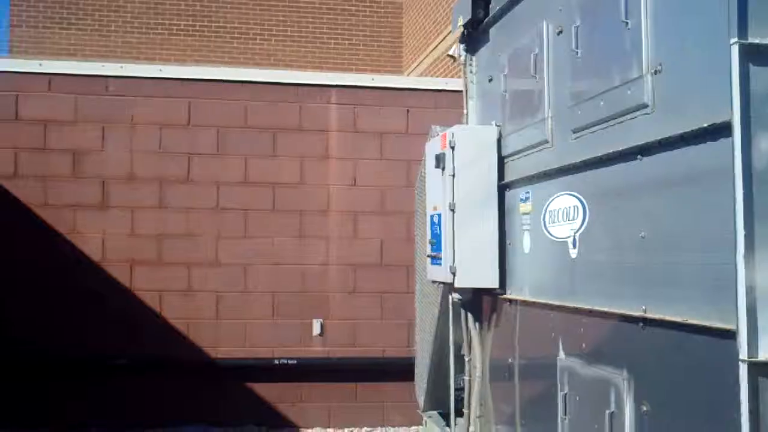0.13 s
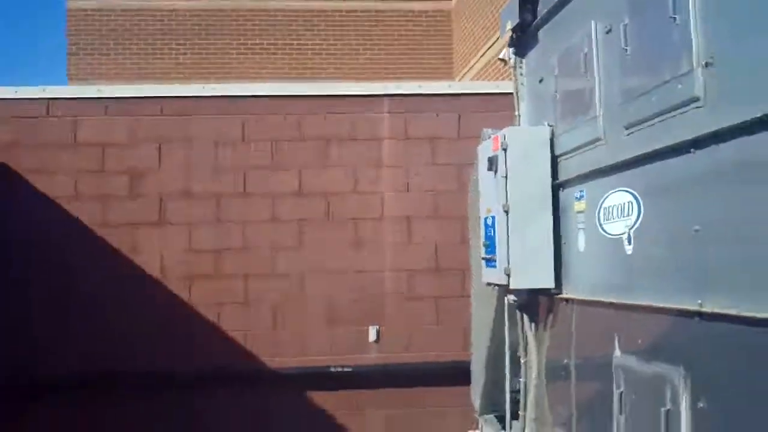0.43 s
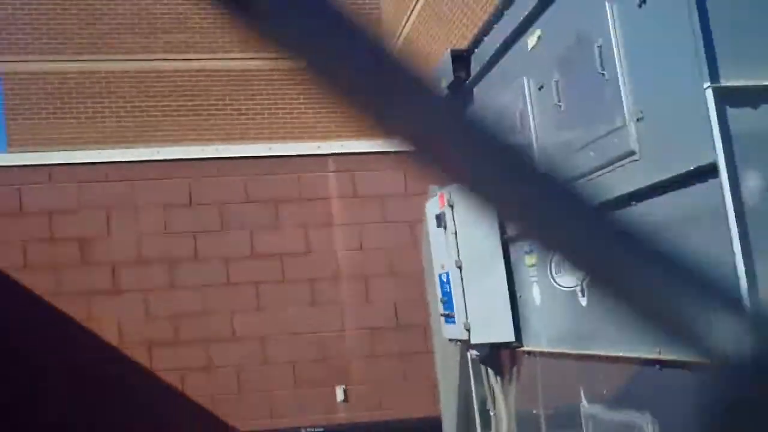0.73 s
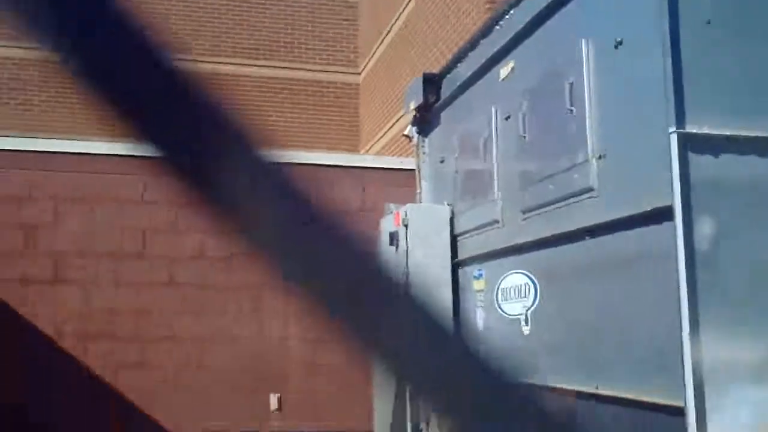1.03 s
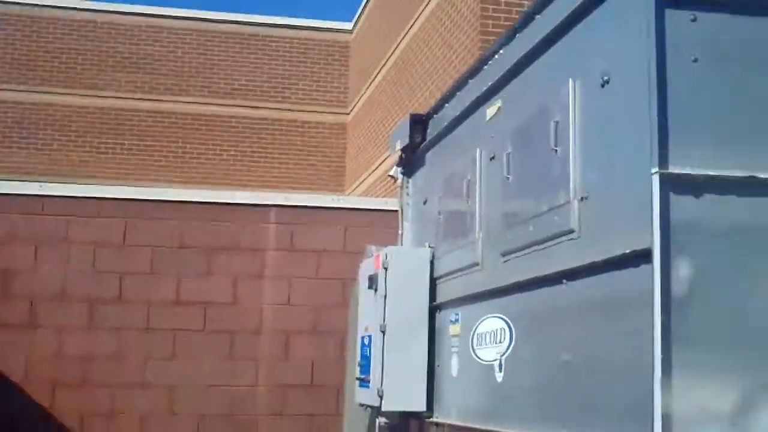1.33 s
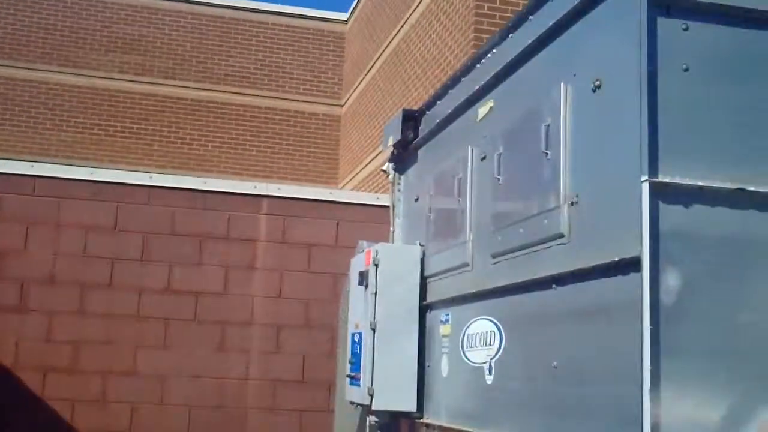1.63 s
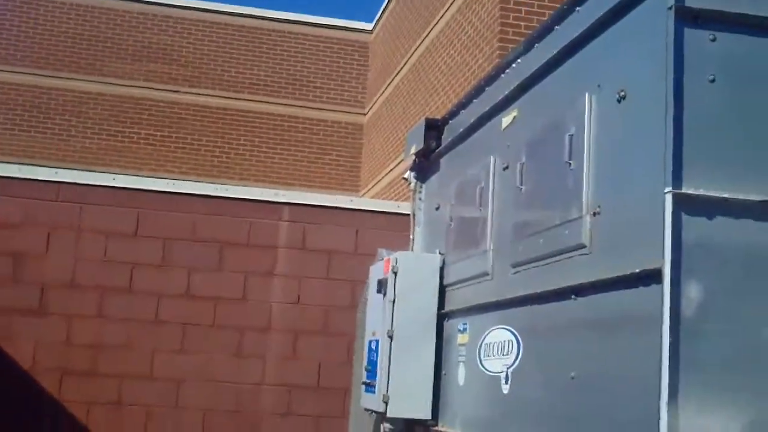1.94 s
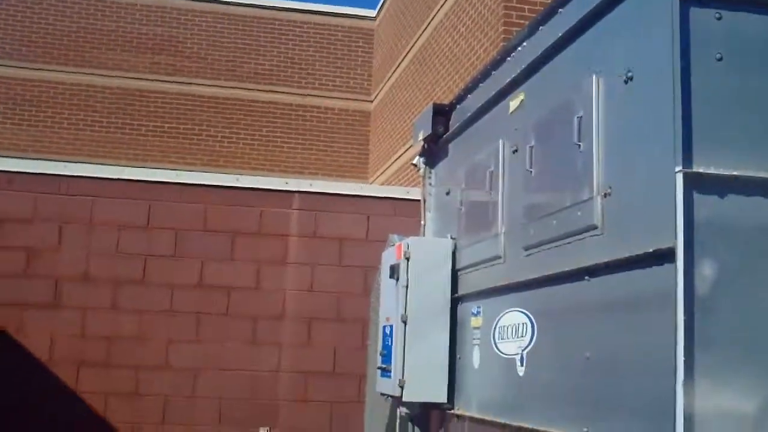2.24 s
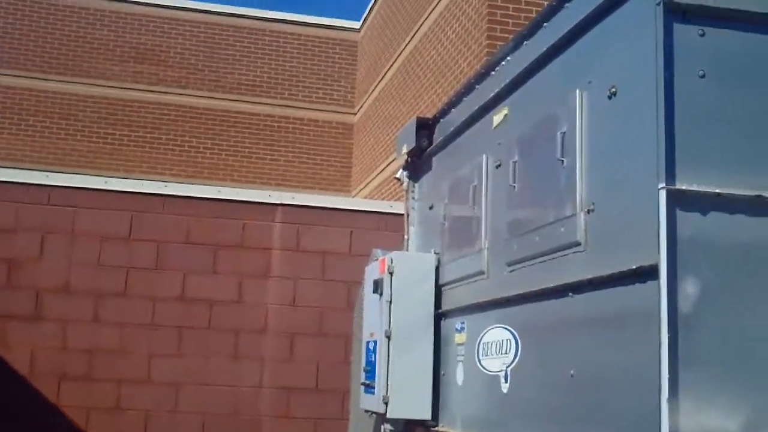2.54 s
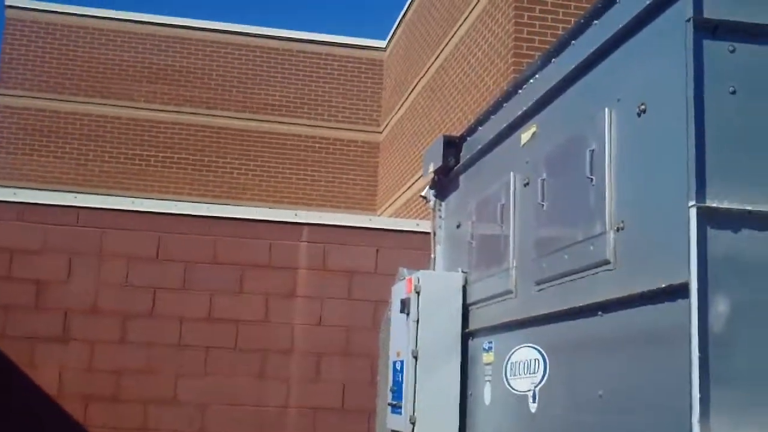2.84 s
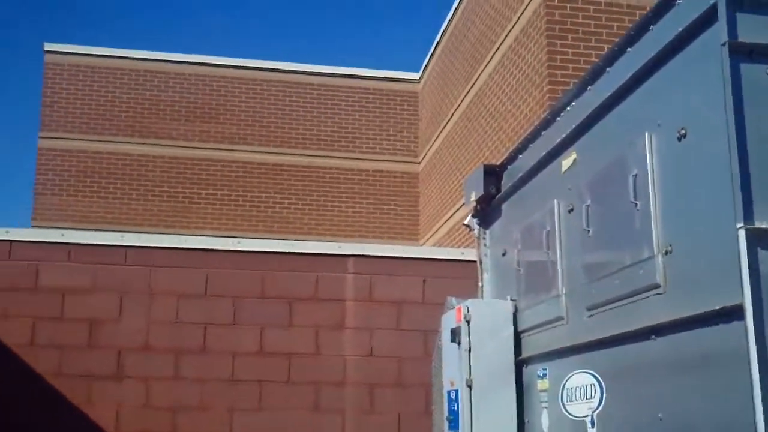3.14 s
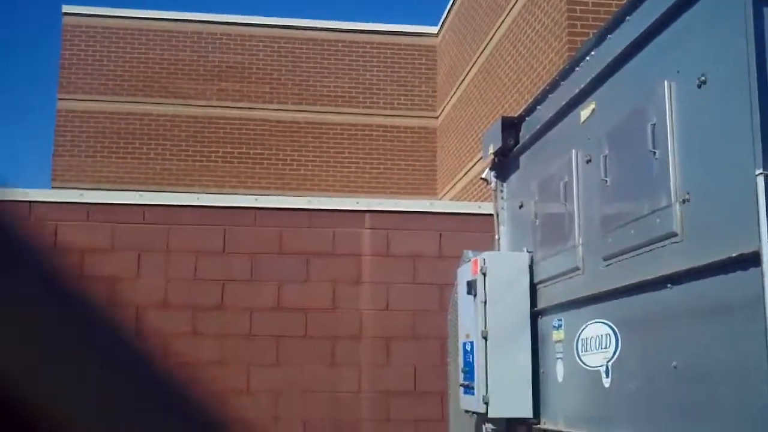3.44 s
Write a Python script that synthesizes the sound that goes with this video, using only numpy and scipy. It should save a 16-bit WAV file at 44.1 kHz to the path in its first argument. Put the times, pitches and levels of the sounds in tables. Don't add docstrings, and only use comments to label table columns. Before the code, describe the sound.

A large fan in outdoor cooling equipment roars steadily in a walled brick yard. A loud overloaded pop opens it, then fingers tick and rub on the small hand-held recorder's plastic case, with sparser clicks later.

```python
import sys
import numpy as np
from scipy import signal
from scipy.fft import rfft, irfft
from scipy.io import wavfile

SR = 44100
rng = np.random.default_rng(int(sys.argv[2]) if len(sys.argv) > 2 else 0)


def to_wav(sig):
    pcm = np.clip(np.atleast_2d(sig), -1, 1) * 32767
    pcm = np.round(pcm).astype(np.int16)
    wavfile.write(sys.argv[1], SR, pcm.T)


def magnitude_from_level(level_db):
    exponent = np.asarray(level_db, float) / 20
    return 10 ** exponent


N = 158760

START_S = .07317


def rms_one(x):
    return x / np.sqrt(np.mean(x ** 2) + 1e-20)


def drift(rate_hz):
    r = np.exp(-80 * np.pi * rate_hz / SR)
    noise = rng.standard_normal(N // 40 + 2002)
    slow = signal.lfilter([1], [1, -2 * r, r * r], noise)[2000:]
    return np.interp(np.arange(N) / 40, np.arange(len(slow)), rms_one(slow))


def ring(x, hz, t60):
    r = magnitude_from_level(-60 / (t60 * SR))
    w = 2 * np.pi * hz / SR
    return signal.lfilter([0, np.sin(w)], [1, -2 * r * np.cos(w), r * r], x + 1e-18)


def switch_on_pop():
    # (time [s], height [full scale], rise [s], decay [s])
    surges = [
        (.07317, 1.31, .00002, .0073),
        (.0773, .55, .00015, .002),
        (.0809, 1.05, .0004, .003),
        (.0846, .3, .0005, .001),
    ]
    let_go_s, let_go_decay_s = .0822, 0.0051
    t = np.arange(N) / SR
    surge = 0
    for s, height, rise, decay in surges:
        since = np.clip(t - s, 0, 1)
        surge = surge + height * (1 - np.exp(-since / rise)) * np.exp(-since / decay)
    return surge * np.exp(-np.clip(t - let_go_s, 0, 1) / let_go_decay_s)


def airflow(spectrum, shared_db, own_db, rate_hz):
    hz = np.maximum(np.fft.rfftfreq(N, 1 / SR), 1)
    at, db = np.transpose(spectrum)
    colour_db = np.interp(np.log(hz), np.log(at), db, left=-90, right=-90)
    coloured = rfft(rng.standard_normal(N)) * magnitude_from_level(colour_db)
    place = 3 * np.log2(hz)
    together = drift(2.5)
    out = 0
    for k in range(int(3 * np.log2(at[0])), int(3 * np.log2(at[-1])) + 2):
        overlap = np.clip(1 - abs(place - k), 0, 1)
        band = irfft(coloured * overlap, N)
        out = out + band * magnitude_from_level(shared_db * together + own_db * drift(rate_hz))
    return rms_one(out)


def fan_rumble():
    # (frequency [Hz], density [dB per Hz])
    rumble_curve = [(12, 1), (25, -6), (55, -8.5), (150, -6.5), (310, -8), (700, -8.5), (1150, -11),
                    (1350, -19), (1800, -67)]
    return magnitude_from_level(-39) * airflow(rumble_curve, shared_db=-0.43, own_db=1.0, rate_hz=8.5)


def blade_and_motor_hum():
    # (frequency [Hz], width [Hz], level [dB])
    hum_bands = [(76.5, 6.5, -51), (171.5, 14.7, -44), (358, 14, -54.5), (244.3, 46, -47.5),
                 (391.8, 6.3, -55), (618.6, 20, -57), (850, 190, -50.5)]
    # (frequency [Hz], level [dB rms])
    motor_tones = [
        (357.5, -53.5),
        (715.5, -58),
        (14443, -83),
    ]
    out = 0
    for hz, width, db in hum_bands:
        once = ring(rng.standard_normal(N), hz, 1.52 / width)
        out = out + magnitude_from_level(db) * rms_one(ring(once, hz, 1.42 / width))
    for hz, db in motor_tones:
        level = magnitude_from_level(db + 6.5 + 3.0 * drift(2.7))
        phase = 2 * np.pi * np.cumsum(hz + 1.17 * drift(4.9)) / SR
        out = out + level * np.sin(phase)
    return out


def air_hiss():
    # (frequency [Hz], density [dB per Hz])
    hiss_curve = [(900, -37), (1300, -5.5), (2000, -3), (3300, -5.5), (3800, -10), (7500, -10),
                  (12000, -16.5), (15500, -32), (16000, -40)]
    # (time [s], hiss level [dB])
    mic_aim = [(0, 2), (.4, 1), (.65, 1.6), (1, 1.1), (1.4, 0.5), (1.9, 0.5), (2.25, 0.8), (2.6, 1),
               (3.1, 1), (3.6, 0.5)]
    aim_db = np.interp(np.arange(N) / SR, *np.transpose(mic_aim))
    return magnitude_from_level(-42 + aim_db) * airflow(hiss_curve, shared_db=0.2, own_db=0.94, rate_hz=14.6)


def friction(strokes, spread):
    grains_per_s, top_hz, patchy_db, patches_per_s, edge_s = 5200, 14000, 3.0, 70, .002
    t = np.arange(N) / SR
    grains = rms_one((rng.random(N) < grains_per_s / SR) * rng.standard_normal(N))
    grains = signal.lfilter(*signal.butter(4, top_hz, fs=SR), grains)
    grains = grains * magnitude_from_level(patchy_db * drift(patches_per_s))
    out = 0
    for s, length, db, hz, fade_db in strokes:
        edges = np.clip(np.minimum(t - s, (s + length - t) / 2) / edge_s, 0, 1)
        shape = edges * magnitude_from_level(fade_db * np.clip((t - s) / length, 0, 1))
        band = signal.butter(1, [hz / spread, min(hz * spread, .45 * SR)], "band", fs=SR)
        out = out + magnitude_from_level(db) * shape * rms_one(signal.lfilter(*band, grains))
    return out


def finger_rubs():
    # (start [s], length [s], level [dB], centre [Hz], fade over the length [dB])
    rub_strokes = [(.1372, .012, -25, 2500, -8), (.2665, .045, -34, 5500, -8), (.092, .025, -38, 3500, 0),
                   (.15, .03, -38, 2500, 0), (.167, .012, -33, 1800, 0), (.1035, .009, -33, 2500, 0),
                   (.355, .008, -33, 3000, -8), (1.6955, .007, -35, 3500, -6),
                   (1.7035, .009, -36, 5000, -4), (3.029, .007, -38, 4000, -5), (.439, .007, -36, 2200, -5),
                   (.31, .22, -43, 4800, -5), (.81, .037, -37, 7000, 1), (1.135, .022, -38, 6500, 0),
                   (1.165, .035, -44, 5500, 0), (1.27, .03, -44, 6000, 0)]
    return friction(rub_strokes, spread=1.26)


def case_ticks():
    # (time [s], level near 4 kHz [dB], then relative to it: near 6
    # kHz [dB], below 3.4 kHz [dB], above 8 kHz [dB])
    tick_events = [(.0932, -11.5, -8, -3, -22), (0.1025, -11, -7, -5.5, -13), (0.1033, -22, 6, -2, -10),
                   (.107, -29, -2, -8, 3), (0.1087, -17, -3, 4, -14), (.1133, -22, 5, 2, -12),
                   (0.1351, -5.5, 7.5, -19, -20), (.139, -4, -11, -5.5, -15), (0.1378, -12, -6, -9, -17),
                   (.142, -22, 0, 6, -16), (.148, -15, 0, -1.5, -21), (.158, -20, 3, 6.5, -19),
                   (.1658, -11.5, -5, -9, -25), (.1736, -17.5, -4.5, 1, -11), (0.2392, -23, -3, -21, -8),
                   (0.2658, -13.5, -4, -5.5, -13), (.3491, -9.5, -3, -2.5, -14),
                   (.3525, -7.5, 2.5, -0.5, -8.5), (0.3536, -10.5, 2, -19, -8), (0.437, -26, -3, 8.5, -22),
                   (.515, -27.5, 0, -21, -20), (0.6603, -8.5, 0.5, -20.5, -9.5), (0.984, -35, -6, -10, -20),
                   (1.1495, -27, -7, -4, -23), (1.1945, -27, -12, -2, -20), (1.359, -36, -4, 8.5, -14),
                   (1.6946, -5.5, -1, -12, -13), (1.7049, -9, -0.5, -8, -9.5), (2.444, -36, 0, 8, -12),
                   (2.9171, -19.5, -6, -20, -6), (3.0219, -24, -13, -3, -24), (3.0277, -22.5, 16.5, 0.5, 4)]
    # (frequency [Hz], level [dB], t60 [s])
    case_modes = [(1130, -1, 0.0056), (1500, 2, 0.004), (2230, -1.5, 0.0064), (2880, 0, 0.0047),
                  (3750, 1.5, 0.0053), (4520, 4.5, 0.0035), (5460, -7.5, 0.0058), (6610, 1.5, 0.0034),
                  (7560, -5.5, 0.0036), (8860, -1.5, 0.0044), (9760, 6, 0.0032), (10850, 4.5, 0.0045),
                  (12670, 1.5, 0.003), (15400, -6, .0015)]
    range_trim_db = [-0.5, -6.5, -2.5, -3]
    contact_s, stagger_s, rebound_s, rebound = .0002, .00025, .00035, .3
    start, db_4k, rel_6k, rel_low, rel_high = np.array(tick_events).T
    luck = rng.standard_normal((len(start), len(case_modes), 3))
    out = np.zeros(N)
    for k, (hz, db, t60) in enumerate(case_modes):
        part = np.searchsorted([3400, 5000, 8200], hz)
        share_db = [rel_low, 0, rel_6k, rel_high][part] + range_trim_db[part]
        strength, sign, delay = luck[:, k].T
        size = magnitude_from_level(db_4k + share_db + db + strength) * np.sign(sign)
        snap_s = start + contact_s + stagger_s * abs(delay)
        back_s = start + contact_s + stagger_s + rebound_s * (1 + abs(sign) / 2)
        push = np.zeros(N)
        np.add.at(push, (snap_s * SR).astype(int), size)
        np.add.at(push, (back_s * SR).astype(int), rebound * size * np.sign(delay))
        band = signal.butter(1, [hz / 1.25, hz * 1.25], "band", fs=SR)
        out += ring(signal.lfilter(*band, push + 1e-18), hz, t60)
    return out


def soft_pushes(events):
    out = 0
    for s, db, hz, t60 in events:
        r = np.exp(-2 * np.pi * hz / SR)
        click = -magnitude_from_level(db) * (np.arange(N) == int(s * SR))
        push = signal.lfilter([1.37 * (1 - r)], [1, -r], click + 1e-18)
        out = out + ring(push, hz, t60)
    return out


def tick_accents():
    # (time [s], level [dB], frequency [Hz], t60 [s])
    accents = [(.1354, -5.5, 1320, .005), (.1356, -23, 12600, .004), (.1135, -20, 640, .008),
               (.1095, -16, 3600, 0.0053), (.1422, -16, 760, 0.008), (.1422, -16, 1600, .01),
               (.1482, -26, 12500, .004), (.1582, -22, 3800, .006), (.166, -16, 720, 0.011),
               (.1738, -12, 3800, 0.0039), (.3527, -18, 700, .008), (.3539, -12, 12000, .005),
               (.4374, -17, 4600, 0.0059), (.4376, -14, 2300, 0.015), (.438, -20, 2900, .01),
               (.6605, -16, 3900, 0.0094), (1.7052, -16, 4500, .005), (1.6946, -15, 2600, 0.0053),
               (3.028, -23, 3500, 0.0098), (.3495, -12, 2100, 0.0058), (.4374, -14.5, 5500, 0.0057),
               (.6605, -13, 7100, 0.0066), (1.6944, -12.5, 5800, 0.0033), (3.2, -23, 3700, 0.0043),
               (.658, -25, 4300, .008), (.331, -31, 4400, .005), (.336, -30, 2100, .012),
               (2.444, -28, 1940, 0.0092), (2.444, -34, 5700, .005), (.6612, -19, 4600, 0.0066),
               (3.0277, -14, 7500, .004)]
    return soft_pushes(accents)


def palm_thuds():
    # (time [s], level [dB], frequency [Hz], t60 [s])
    palm_hits = [(.121, -12, 625, 0.013), (.1345, -24, 560, 0.005), (0.1363, -13.5, 870, 0.015),
                 (0.1402, -18, 1170, 0.021), (.349, -24.5, 109, 0.045), (0.35, -24.5, 189, 0.057),
                 (0.354, -24.5, 439, 0.087), (.35, -19, 870, 0.034), (.3535, -25, 620, 0.0073),
                 (.4355, -22.5, 750, 0.03), (0.437, -9.5, 2710, 0.013), (.439, -17, 1440, 0.023),
                 (0.974, -27.5, 45.6, .1), (1.3595, -21.5, 800, 0.013), (1.706, -21, 850, 0.047),
                 (3.028, -23.5, 884, 0.038), (.174, -15, 880, 0.0088), (.266, -15, 780, 0.0074)]
    return soft_pushes(palm_hits)


def squeaks():
    # (start [s], length [s], level [dB], centre [Hz], fade over the length [dB])
    squeak_strokes = [(.2665, .03, -35, 4000, -6), (.277, .03, -37, 6300, -4), (.268, .03, -45, 10500, -3),
                      (.812, .02, -44, 9400, -3), (1.136, .018, -38, 5600, -2), (1.168, .012, -44, 5300, 0),
                      (.98, .008, -40, 3500, -4), (2.27, .04, -44, 950, -3)]
    return friction(squeak_strokes, spread=1.02)


def microphone_port(x):
    # (frequency [Hz], width [Hz], gain [dB])
    port_shape = [(4800, 1730, 3.5), (5660, 720, -6.5), (6330, 670, 1), (7700, 2000, -7),
                  (10070, 1000, 3.5)]
    hz = np.fft.rfftfreq(N, 1 / SR)
    gain_db = sum(db / (1 + (2 * (hz - at) / width) ** 2) for at, width, db in port_shape)
    return irfft(rfft(x) * magnitude_from_level(gain_db), N)


def scene():
    fan = fan_rumble() + blade_and_motor_hum()
    through_port = microphone_port(air_hiss() + finger_rubs())
    handling = case_ticks() + tick_accents() + palm_thuds() + squeaks()
    return (fan + through_port + handling)[None]


def band_limit(x):
    return signal.sosfilt(signal.butter(12, 16730, fs=SR, output="sos"), x)


def record(dry):
    coupling_s, fade_in_s, cutoff_hz = 0.092, 0.013, 16850
    t = np.arange(N) / SR
    live = dry * np.clip((t - START_S) / fade_in_s, 0, 1) + switch_on_pop()
    live = signal.lfilter([1, -1], [1, -np.exp(-1 / (coupling_s * SR))], live)
    live = np.clip(live, -1, 1)
    top_cut = signal.cheby2(10, 50, cutoff_hz, fs=SR, output="sos")
    live = signal.sosfiltfilt(top_cut, live) * (t > START_S - .001)
    return band_limit(np.clip(live, -1, 1))


dry = scene()
out = record(dry)
to_wav(out)
```